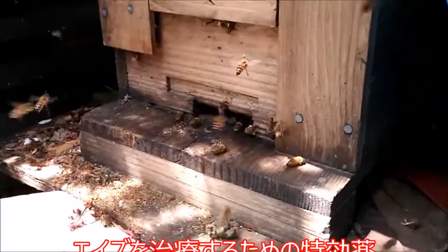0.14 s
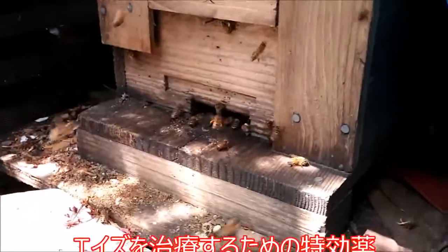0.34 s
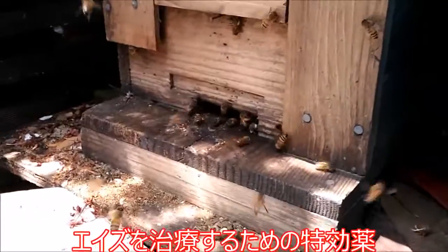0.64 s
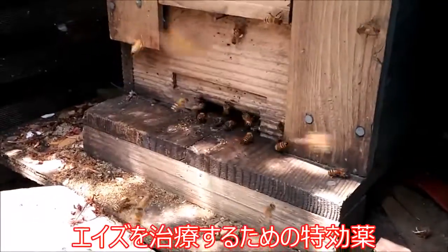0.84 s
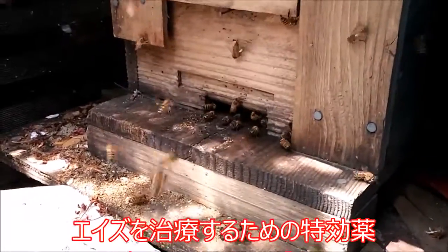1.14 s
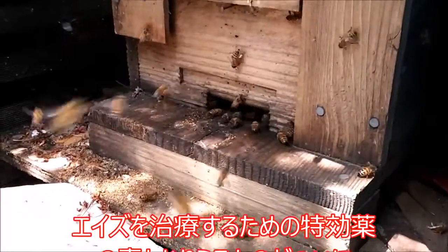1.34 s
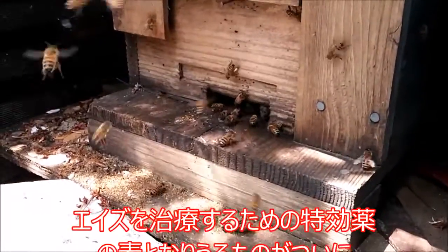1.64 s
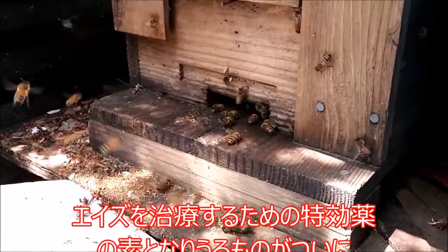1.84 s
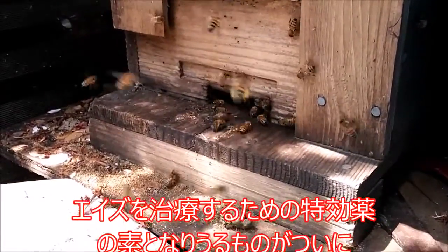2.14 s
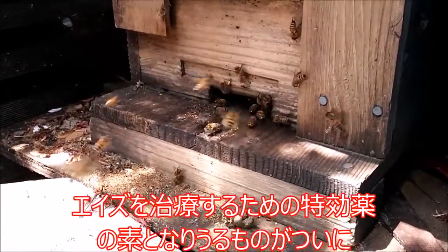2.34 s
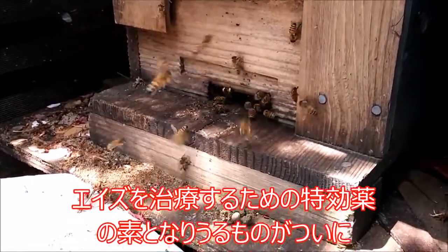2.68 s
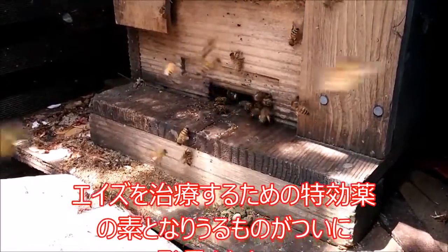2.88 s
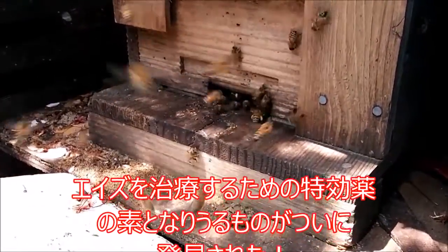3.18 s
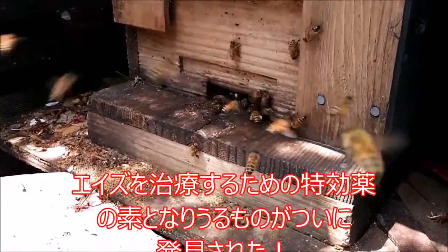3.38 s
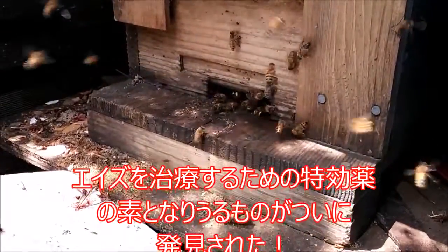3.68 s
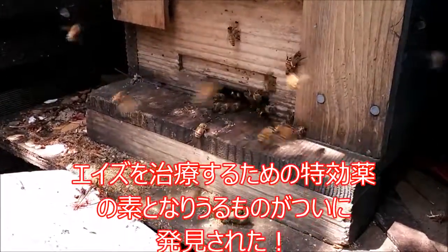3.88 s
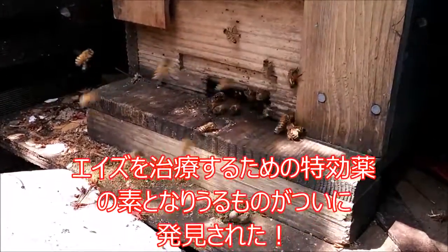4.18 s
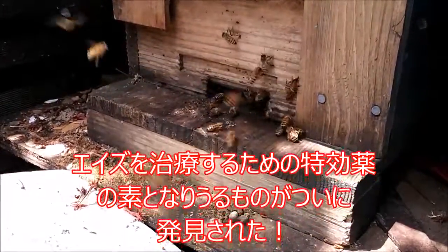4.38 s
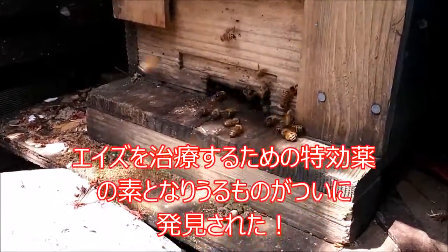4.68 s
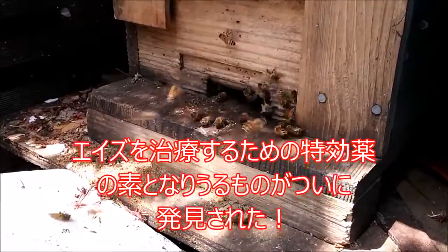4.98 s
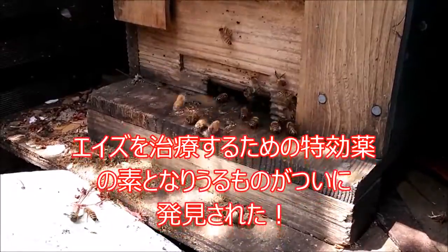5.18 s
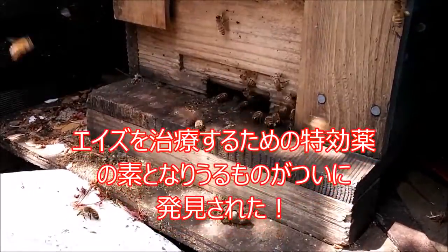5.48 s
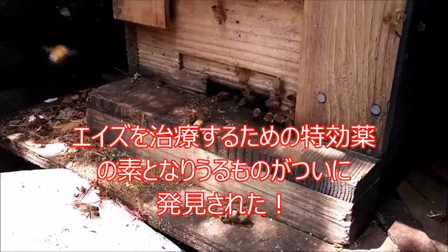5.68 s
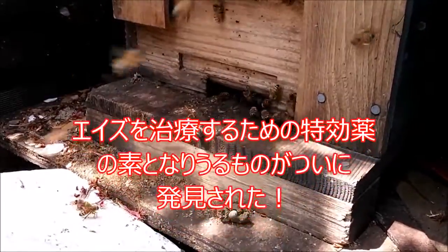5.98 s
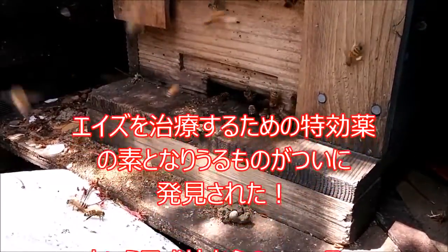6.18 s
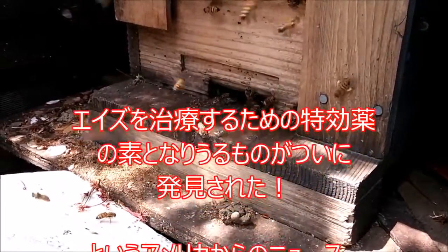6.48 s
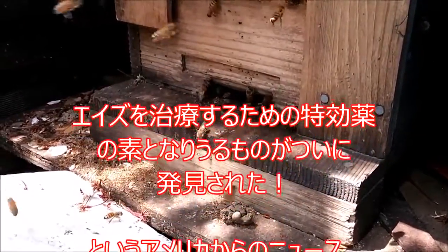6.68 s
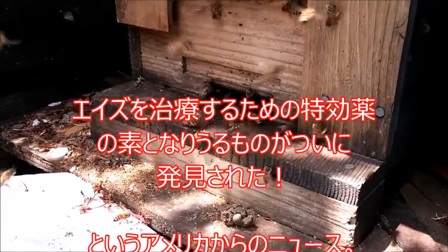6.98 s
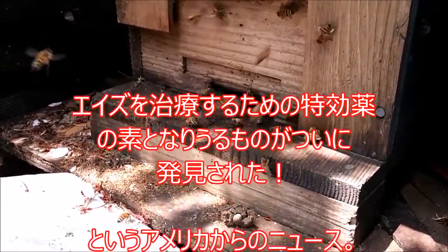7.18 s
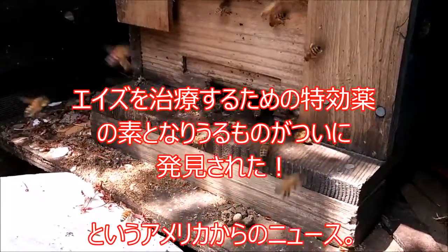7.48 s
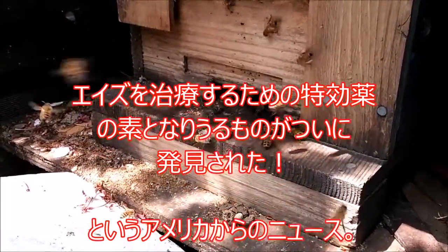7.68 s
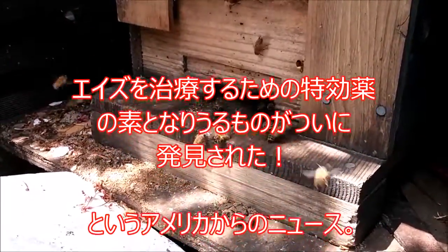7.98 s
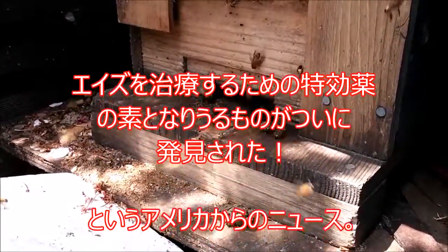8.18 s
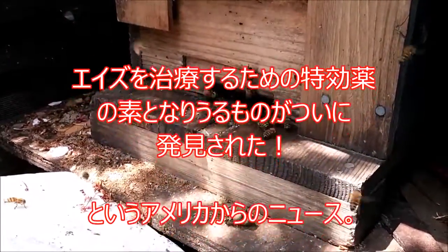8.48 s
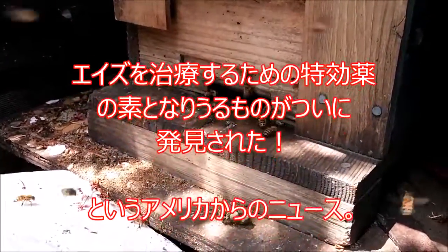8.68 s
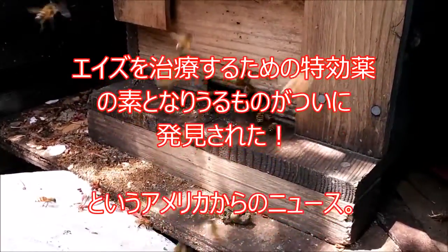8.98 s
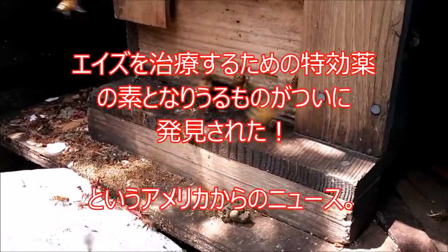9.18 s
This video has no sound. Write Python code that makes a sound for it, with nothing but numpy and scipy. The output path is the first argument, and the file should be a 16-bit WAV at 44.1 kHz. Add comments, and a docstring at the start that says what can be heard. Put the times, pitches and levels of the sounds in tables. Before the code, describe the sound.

Close, dry outdoor pickup beside a hive: a dense low buzz, gusts and airy hiss at first, then a sparser, quieter hum. Light landings tap the wood midway, a bee nudges the microphone, and late on a single bee swoops past far louder than everything else before faint distant buzzing and soft gusts return.

```python
"""A crowd of honeybees hums at a wooden hive entrance outdoors, over wind, a low noise floor and hiss.
At first bees pass and weave nearby in gusts; after two seconds the hum thins and the wind drops.
Two landings then knock on the wood, and a bee bumps the recorder: damped rings with short noise bursts.
Near 7.7 s one bee flies right past: wing-beat overtones, wing hiss and downwash thumping the capsule.
A few fainter bees weave and pass in its wake, with soft late gusts."""
import sys
import numpy as np
from scipy import signal
from scipy.fft import rfft, irfft, next_fast_len
from scipy.io import wavfile
from scipy.ndimage import uniform_filter1d

SR = 44100
rng = np.random.default_rng(int(sys.argv[2]) if len(sys.argv) > 2 else 0)


def store_wav(level_fs):
    """Save 16-bit WAV to argv[1]."""
    pcm = np.round(np.clip(np.atleast_2d(level_fs), -1, 1) * 32767)
    wavfile.write(sys.argv[1], SR, pcm.T.astype(np.int16))


N = 411629
T = np.arange(N) / SR


def undb(db):
    """Turn dB into gain."""
    return 10 ** (np.asarray(db) / 20)


def unit(x):
    """Scale to rms 1."""
    return x / np.sqrt(np.mean(x ** 2))


def walk(rate, count=N):
    """Random drift: levels held 1 / rate s, then smoothed twice; spread near 1."""
    hold = int(SR / rate)
    steps = np.repeat(rng.standard_normal(count // hold + 1), hold)
    return 1.3 * uniform_filter1d(uniform_filter1d(steps, hold), hold)[:count]


def coloured(shape, count=N):
    """Noise at rms 1, its spectrum drawn through (Hz, relative dB) points."""
    hz, db = np.transpose(shape)
    size = next_fast_len(count)
    log_hz = np.log(np.fft.rfftfreq(size, 1 / SR) + 1)
    gain = undb(np.interp(log_hz, np.log(hz), db, left=-60))
    noise = irfft(rfft(rng.standard_normal(size)) * gain, size)
    return unit(noise[:count])


def ring_decay(t, t60):
    """Exponential decay that falls 60 dB in t60 seconds."""
    return np.exp(-np.log(1000) * t / t60)


def span(table, fade_s=0.0083):
    """Samples that a table covers, its columns drawn out over them, and soft ends."""
    s, *columns = np.transpose(table)
    at = slice(int(s[0] * SR), int(s[-1] * SR))
    fade = np.clip(np.minimum(T[at] - s[0], s[-1] - T[at]) / fade_s, 0, 1)
    return at, [np.interp(T[at], s, c) for c in columns], fade


def wings(hz, first_db, second_db, fifth_db, overtones, wobble, flutter_db, rough):
    """Wing-beat hum: fluttering overtones, no two strokes alike. Also returns the beat phase."""
    count = len(hz)
    phase = 2 * np.pi * np.cumsum(hz * (1 + wobble * walk(40.4, count=count))) / SR
    levels_db = {1: first_db, 2: second_db, 5: fifth_db}
    for multiple, leader, rel_db in overtones:
        levels_db[multiple] = levels_db[leader] + rel_db
    tone = 0
    for k, db in levels_db.items():
        gain = undb(db + flutter_db * walk(31.8, count=count))
        uneven_phase = phase + rough * walk(250, count=count) / 6
        # overtones lag in step with their order: a sharp downstroke and a flat return
        tone = tone + gain * np.cos(k * uneven_phase - 0.73 * (k - 1))
    return -np.sqrt(2) * tone * (1 + rough * walk(200, count=count)), phase


def low_noise():
    """Steady low noise under everything."""
    shape = [(12, -5.5), (40, 3.5), (100, -2.5), (200, -12.0), (400, -13.5), (800, -33.5)]
    return undb(-75) * coloured(shape)


# gusts on the capsule: start_s, length_s, start_level_db, end_level_db
GUSTS = [(-.05, 0.37, -53, -52.5), (0.34, 0.91, -49, -53.5), (1.308, 0.34, -46, -60.5),
         (1.658, 0.4, -54, -62.5), (2.018, 0.11, -53, -55), (5.043, 0.33, -62, -65),
         (5.593, 0.16, -84, -60.5), (6.09, 0.22, -58.5, -70.5), (7.397, 0.76, -72, -70),
         (8.7, 0.18, -64, -63.5), (9.045, 0.17, -58, -65.5), (9.228, 0.15, -61.5, -64)]
# spectrum of wind on the capsule: frequency_hz, density_db (relative, per Hz)
WIND_SPECTRUM = [(12, -13), (25, 3.5), (70, 3.5), (130, -9.5), (180, -12.5), (300, -14.5), (500, -13),
                 (900, -34)]


def wind():
    """Gusts of low noise: each rises, drifts in level and dies away, with a random flutter."""
    rise_s, fall_s = 0.039, 0.028
    level = 0
    for s, length, start_db, end_db in GUSTS:
        drift = undb(np.interp(T, [s, s + length], [start_db, end_db]))
        rise = np.clip((T - s) / rise_s, 0, 1)
        fall = np.exp(-np.maximum(T - s - length, 0) / fall_s)
        level = level + drift * rise * fall
    return level * undb(2.5 * walk(18)) * coloured(WIND_SPECTRUM)


# spectrum of the background noise: frequency_hz, density_db (relative, per Hz)
NOISE_SPECTRUM = [(150, -18), (300, -9), (700, -9), (1700, -10), (2300, -10), (4000, -10.5), (6000, -12.5)]
# levels of the surroundings: time_s, far_bees_level_db, noise_level_db (noise plays 1.5 dB lower)
AROUND = [(0, -63.5, -61), (.2, -55, -56), (.4, -55, -53.5), (.56, -55, -56.5), (.75, -57.5, -58),
          (1.15, -57.5, -58.5), (1.45, -59.5, -58.5), (2.2, -60.5, -59), (2.29, -69, -66),
          (2.9, -73, -68.5), (3.3, -72.5, -68.5), (3.75, -74, -73), (3.85, -77, -73.5), (4.401, -75, -72.5),
          (4.5, -73, -68), (5.04, -68, -66), (5.09, -63, -54.5), (5.22, -67, -62.5), (5.451, -68.5, -67),
          (5.81, -69, -69.5), (5.87, -79, -76), (6.14, -72, -70), (6.6, -76, -67), (6.66, -76.5, -74.5),
          (7.4, -79.5, -74), (8.1, -77, -74.5), (8.7, -80, -73), (8.85, -75.5, -74.5), (9.33, -78, -82)]


def broad_noise():
    """Broad background noise that swells and sinks, with a slight random flutter."""
    s, _, noise_db = np.transpose(AROUND)
    level_db = np.interp(T, s, noise_db) - 1.5
    return undb(level_db + .8 * walk(12)) * coloured(NOISE_SPECTRUM)


# spectrum of the treble hiss: frequency_hz, density_db (relative, per Hz)
HISS_SPECTRUM = [(2500, -57.5), (4500, -15), (7000, -4), (9500, 4.5), (12000, 3), (14000, -5.5),
                 (16000, -7.5)]
# swell of the treble hiss: time_s, level_db
HISS_LEVEL = [(0, -60), (.2, -59.5), (.4, -55), (.56, -58), (1.2, -59.5), (2.09, -63.5), (2.17, -54.5),
              (2.3, -61), (2.75, -61), (4.2, -68.5), (4.45, -67), (4.58, -63), (5.04, -58.5), (5.1, -52.5),
              (5.37, -58.5), (5.81, -63), (5.87, -75), (6.14, -68), (6.43, -61.5), (6.6, -61), (6.66, -79),
              (6.9, -82.5), (9.33, -78.5)]


def treble_hiss():
    """High noise that swells and sinks, with a little random flutter."""
    level_db = np.interp(T, *np.transpose(HISS_LEVEL))
    return undb(level_db + 1.3 * walk(9)) * coloured(HISS_SPECTRUM)


def crowd(count):
    """Further bees: each wanders in pitch, beats unevenly and is heard in snatches."""
    overtones = [(1, 2), (2, 2.5), (3, -1.0), (4, -1.5), (5, 1.0), (6, -2.5), (7, -1.5),
                 (8, -7.0), (9, -15), (10, -16), (11, -16), (12, -21), (14, -20)]  # (multiple, dB)
    hum = 0
    for middle_hz in np.linspace(205, 258, count):
        beat_hz = middle_hz * (1 + .025 * walk(9) + .006 * walk(45))
        phase = 2 * np.pi * np.cumsum(beat_hz) / SR
        # a bee's hum is directional, so its overtones swell apart as it turns
        tone = sum(undb(db + 3.5 * walk(20)) * np.cos(k * phase) for k, db in overtones)
        hum = hum + undb(3.5 * walk(9)) * tone
    s, crowd_db, _ = np.transpose(AROUND)
    return undb(np.interp(T, s, crowd_db)) * unit(hum)


# thin, bright hum of bees further off: multiple (of the beat), leader (overtone followed),
# relative_level_db (against the leader)
THIN_OVERTONES = [(3, 2, -11.5), (4, 5, -1.5), (6, 5, -9.5), (7, 5, -0.5), (8, 5, -8.5), (9, 5, -7.5),
                  (10, 5, -6), (11, 5, -7.5), (12, 5, -18)]
# weaving bees, one table per stay: time_s, wing_beat_hz, fundamental_level_db,
# second_overtone_level_db, fifth_overtone_level_db
HOVER = [
    [(0.17, 227.8, -69, -59, -70), (0.26, 218.5, -51, -51, -69), (0.296, 238.3, -49, -51, -72),
     (0.372, 218, -49.5, -47.5, -62), (0.46, 248.8, -51, -50, -76), (0.5, 231, -50, -55, -81),
     (0.54, 246.4, -60, -53, -70), (0.586, 235, -51, -58, -74), (0.66, 243, -60, -55, -73),
     (0.694, 246.7, -58, -61, -72), (0.776, 234.2, -53, -59.5, -79), (0.82, 244, -53, -57, -81),
     (0.88, 245, -64, -66, -89), (0.938, 248, -48, -64, -69), (0.96, 263, -73, -65, -77),
     (0.99, 266, -73, -64, -73)],
    [(4.85, 243, -76, -76, -91), (4.872, 241, -73, -84, -81), (5.048, 249.7, -67, -73, -85),
     (5.058, 245.8, -62, -61, -79), (5.132, 237, -58.5, -64, -74), (5.21, 245.5, -60, -60, -77),
     (5.328, 228.4, -65, -65.5, -79), (5.368, 232, -79, -66, -73), (5.42, 238, -76, -77, -87)],
    [(5.6, 247, -79, -79, -83), (5.636, 229, -69, -74, -81), (5.686, 223, -61, -60, -81),
     (5.696, 219, -64, -63, -77), (5.75, 209.3, -76, -63, -78), (5.782, 210, -75, -73, -87),
     (5.84, 210, -91, -78, -83)],
    [(8.1, 230.6, -82, -96, -101), (8.194, 245.4, -90, -73, -88), (8.25, 251, -80, -90, -88),
     (8.362, 220.2, -88, -77, -91), (8.45, 221, -82, -74, -86), (8.51, 226.3, -83, -85, -89),
     (8.588, 253, -86, -82, -94), (8.716, 231.3, -85, -81, -87), (8.884, 246.4, -87, -81, -94),
     (8.914, 231.5, -71, -77, -93), (9.038, 234, -84, -96, -99), (9.116, 262.4, -76, -88, -100),
     (9.196, 256.5, -85, -84, -93), (9.33, 272, -80, -85, -93)],
]


def hoverers():
    """Bees that stay in earshot, their beat rising and sinking as they weave."""
    out = np.zeros(N)
    for table in HOVER:
        at, columns, fade = span(table, fade_s=0.034)
        hum, _ = wings(*columns, THIN_OVERTONES, wobble=0.003, flutter_db=1.8, rough=0.05)
        out[at] += fade * hum
    return out


# bees heard one by one: nearest_s, approach_s, departure_s, coming_beat_hz, nearest_beat_hz,
# leaving_beat_hz, then levels when nearest: fundamental_level_db, second_overtone_level_db,
# fifth_overtone_level_db
PASSES = [ (0.04, .1, 0.41, 242, 246.3, 255.3, -53.5, -63, -86),
          (0.401, 0.13, 0.16, 251.5, 263, 258.4, -60, -59, -72),
          (1.02, .14, 0.23, 237.2, 246, 244.4, -67, -61, -75),
          (1.179, 0.15, 0.27, 273.5, 283.7, 300.3, -61.5, -62, -71),
          (1.46, 0.14, 0.12, 248.6, 246.6, 236, -58.5, -65, -73),
          (1.5, 0.29, 0.2, 212, 220.4, 224.5, -63, -67, -93),
          (1.74, .14, 0.21, 243.2, 233.5, 236.4, -59, -59.5, -76),
          (1.8, 0.15, 0.12, 225.1, 219, 226.5, -68, -60, -74),
          (2.059, 0.11, 0.086, 230, 234, 227, -64, -72, -90),
          (2.25, .12, 0.12, 228.3, 231, 230, -73, -67, -77),
          (2.5, .25, 0.28, 236.6, 235.4, 232.7, -78.5, -71.5, -84.5),
          (3.6, 0.45, 0.41, 205.8, 203.4, 198, -90.5, -82, -91),
          (4.08, 0.15, 0.13, 219, 222.7, 230, -86, -85, -89),
          (6.17, 0.059, 0.18, 250, 248, 252.5, -74.5, -76.5, -98),
          (6.8, 0.41, 0.29, 233.6, 244, 238, -77.5, -79, -89.5),
          (7.252, 0.17, 0.26, 228.7, 249.4, 237, -80, -85, -105),
          (7.1, 0.25, 0.25, 246.5, 237.7, 242, -85, -87, -89.5),
          (5.55, .15, 0.21, 244.5, 242.7, 239, -90, -93, -82),
          (8.85, 0.14, 0.2, 236.3, 247.3, 239, -73.5, -78, -97),
          (9.25, 0.23, 0.088, 219.8, 217, 218, -76, -74.5, -91.5),
          (9.26, 0.15, 0.073, 276, 277, 274, -88, -78, -102)]


def flyers():
    """Bees that stand out of the crowd come near and leave, louder as they are closer."""
    path_reach = 3.  # along the path from nearest point to either end, in nearest distances
    out = np.zeros(N)
    for s, come, leave, come_hz, near_hz, leave_hz, *levels_db in PASSES:
        path = [(max(s - come, 0), -1, come_hz), (s, 0, near_hz), (s + leave, 1, leave_hz)]
        at, (way, beat_hz), fade = span(path)
        beat_hz = beat_hz * (1 + .013 * walk(14, count=len(way)))  # wanders as the bee steers
        distance_db = -10 * np.log10(1 + (path_reach * way) ** 2)
        heard_db = [db + distance_db for db in levels_db]
        hum, _ = wings(beat_hz, *heard_db, THIN_OVERTONES, wobble=0.005, flutter_db=2.5, rough=0.08)
        out[at] += fade * hum
    return out


# a bee bumps against the recorder: start_s, level_db, ring_hz, t60_s
BUMPS = [(6.1, -39, 445, 0.0062), (6.115, -42, 405, 0.014)]


def bumps():
    """A sudden push rings the casing for a few cycles, with a faint noise tick."""
    out, t = np.zeros(N), T[:SR // 20]
    tick_shape = [(500, -3), (2500, -5), (4500, -15)]
    for s, db, hz, t60 in BUMPS:
        onset = np.minimum(t * hz / 0.11, 1)  # about a ninth of a cycle
        ring = onset * ring_decay(t, t60) * np.cos(2 * np.pi * hz * t - .6)
        tick = np.exp(-t / 0.0035) * coloured(tick_shape, count=len(t))
        i = int(s * SR)
        out[i:i + len(t)] += undb(db - 24.0) * tick - undb(db) * ring
    return out


# knocks on wood: start_s, level_db, brightness_db (per octave above 700 Hz; also lifts the crack),
# pitch_factor, contact_s, ring_length_factor
KNOCKS = [(4.4268, -45, -3, .95, 0.0018, 0.65), (5.0554, -31.5, 0.5, 1.05, 0.00023, 0.97)]
# modes of the board, before each knock's factors: pitch_hz, level_db, t60_s
WOOD_MODES = [(353, 4, 0.15), (390, -12, 0.73), (610, -1, 0.061), (934, -5, 0.15), (1330, -10, 0.049),
              (1715, -1, 0.042), (2200, 5, 0.028), (2400, 4, 0.031), (3040, -2, 0.043)]


def knocks():
    """A light body rings the board's modes, with a short noise crack."""
    out, t = np.zeros(N), T[:SR // 4]
    crack_shape = [(100, -18), (2600, -1), (4200, -11), (6000, -20)]
    for s, db, bright_db, factor, contact_s, length in KNOCKS:
        ring = 0
        for hz, mode_db, t60 in WOOD_MODES:
            gain = undb(mode_db + bright_db * np.log2(hz / 700))
            ring = ring + gain * ring_decay(t, t60 * length) * np.sin(2 * np.pi * hz * factor * t)
        crack = undb(-16.5 + bright_db) * np.exp(-t / 0.011) * coloured(crack_shape, count=len(t))
        onset = np.minimum(t / contact_s, 1)
        i = int(s * SR)
        out[i:i + len(t)] += undb(db) * onset * (ring / np.abs(ring).max() + crack)
    return out


# puffs of air on the capsule: centre_s, peak_level_db, swing_hz, length_s (spread of the bell)
PUFFS = [(0.345, -29.5, 102, 0.0032), (6.107, -48.5, 110, 0.0026), (6.13, -50, 95, 0.0029),
         (7.655, -32, 55, 0.005), (7.668, -23, 75, 0.0036), (7.686, -28, 65, 0.005),
         (7.7005, -9.5, 95, 0.0064), (7.7205, -19.5, 85, 0.005), (7.739, -14.5, 72, 0.0072),
         (7.784, -26.5, 59.4, 0.0064)]


def puffs():
    """Short bell-shaped pressure swings as a wake crosses the capsule."""
    out = np.zeros(N)
    for s, db, hz, length in PUFFS:
        bell = np.exp(-.5 * ((T - s) / length) ** 2)
        out += undb(db) * bell * np.cos(2 * np.pi * hz * (T - s))
    return out


# the close pass: time_s, wing_beat_hz, fundamental_level_db, second_overtone_level_db,
# third_overtone_level_db, fifth_overtone_level_db, wing_hiss_level_db
CLOSE = [(7.5, 189.5, -85, -74, -102, -95, -91), (7.52, 190.6, -78, -79, -96, -86, -87),
         (7.57, 201.5, -52, -59, -78, -86, -84), (7.576, 198.8, -58, -60, -91, -83, -82),
         (7.588, 211.6, -48, -55, -76, -71, -79), (7.616, 209.9, -41, -44.5, -58, -62, -70),
         (7.632, 229, -33, -40, -53, -63, -52), (7.642, 232, -30, -35.5, -59, -62.5, -52.5),
         (7.664, 224.7, -42, -31.5, -52.5, -51.5, -47.5), (7.684, 221, -32, -26.5, -44, -55.5, -50),
         (7.692, 219, -58, -22.5, -42, -53.5, -37), (7.7, 219.2, -31, -30, -44, -47.5, -44),
         (7.732, 215.7, -28, -24.5, -38.5, -44.5, -40.5), (7.786, 203.2, -22, -27.5, -39, -48, -46.5),
         (7.804, 202.6, -22, -28.5, -40.5, -49, -50.5), (7.822, 209, -27, -32.5, -44.5, -53, -53.5),
         (7.848, 219, -31.5, -41, -71, -61, -60), (7.874, 207.6, -55, -43, -75, -74, -64),
         (7.9, 196.5, -57, -52, -81, -65, -63), (7.934, 192.5, -63, -65, -81, -86, -74),
         (8.0, 179, -72, -71, -86, -93, -90), (8.05, 177, -81.5, -80, -99, -100, -97)]
# its other overtones: multiple (of the beat), leader (overtone followed),
# relative_level_db (against the leader)
CLOSE_OVERTONES = [(4, 5, -5.5), (6, 5, -16.5), (7, 5, -14.5), (8, 5, -13.5), (9, 5, -20), (10, 5, -27.5),
                   (11, 5, -25.5)]


def close_pass():
    """The nearest bee: hum, hiss shed twice a wing beat, rasp, eddies and sweeping downwash."""
    wash_s, wash_db, wash_spread_s = 7.7, -30, 0.04
    hiss_shape = [(300, -8.5), (1200, -3.0), (2500, -15), (3500, -15.5),
                  (5500, -10.0), (9500, 4.5), (13000, 0.5), (16000, -7.5)]
    eddy_shape = [(60, -17.5), (200, 0.0), (500, -5.5), (1000, -15.5), (2000, -30.5)]
    wash_shape = [(20, 4), (60, 4.5), (130, -3.5), (300, -12.0), (700, -45)]

    at, (hz, first_db, second_db, third_db, fifth_db, hiss_db), fade = span(CLOSE)
    count = len(hz)
    overtones = [(3, 2, third_db - second_db)] + CLOSE_OVERTONES
    hum, phase = wings(hz, first_db, second_db, fifth_db, overtones,
                       wobble=0.003, flutter_db=1.2, rough=0.07)
    strokes = np.exp(0.39 * np.cos(phase) + 0.8 * np.cos(2 * phase))
    hiss = unit(strokes * coloured(hiss_shape, count=count))
    # the turn of each stroke clicks: unsteady high overtones
    rasp = sum(undb(3 * walk(45, count=count)) * np.cos(k * phase + .04 * k * k)
               for k in range(13, 28))
    wing_noise = undb(hiss_db) * (hiss + undb(-23.0) * rasp)
    # eddies and wash linger as the hum dies away, so their levels swing less
    eddies = undb(0.62 * second_db - 27.5) * coloured(eddy_shape, count=count)
    sweep = undb(wash_db) * np.exp(-.5 * ((T[at] - wash_s) / wash_spread_s) ** 2)
    lingering = undb(0.65 * second_db - 24.5)
    wash = (sweep + lingering) * coloured(wash_shape, count=count)

    out = np.zeros(N)
    out[at] = fade * (hum + wing_noise + eddies + wash)
    return out


def scene():
    """Mix all sources into one channel."""
    background = low_noise() + wind() + broad_noise() + treble_hiss()
    bees = crowd(count=12) + hoverers() + flyers() + close_pass()
    contacts = bumps() + knocks() + puffs()
    return (background + bees + contacts)[None]


def record(dry):
    """The recorder cuts steeply above 15.7 kHz and rests a little below zero."""
    top_cut = signal.ellip(10, .2, 70, 15700, fs=SR, output="sos")
    return signal.sosfilt(top_cut, dry) - .0005


dry = scene()
out = record(dry)
store_wav(out)
```